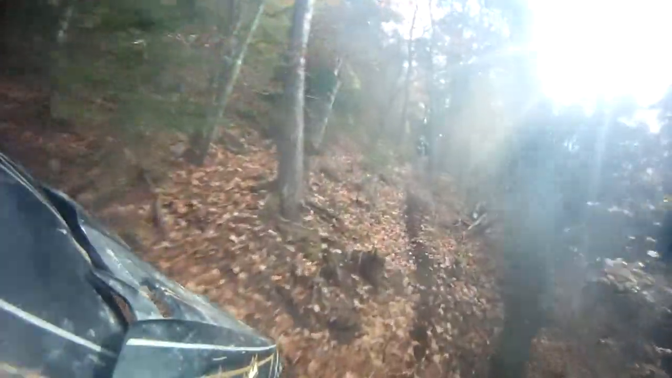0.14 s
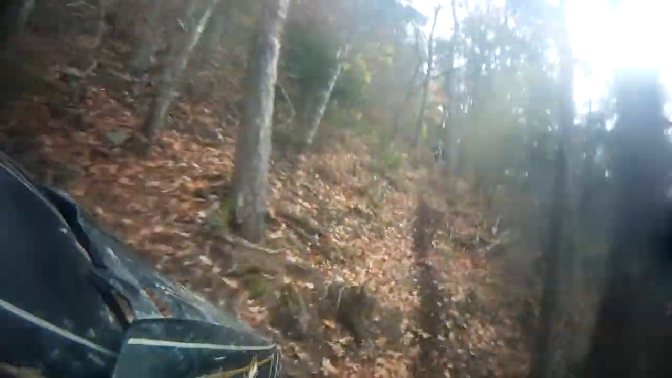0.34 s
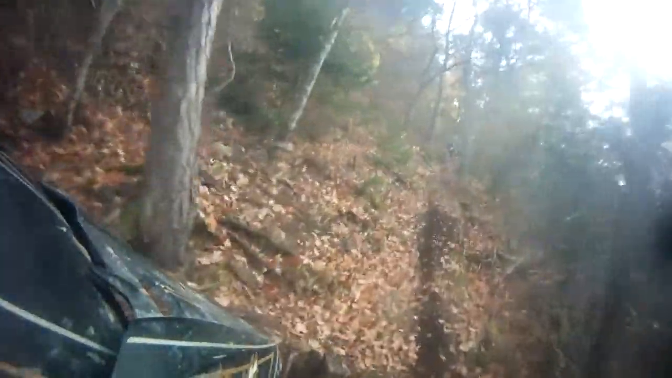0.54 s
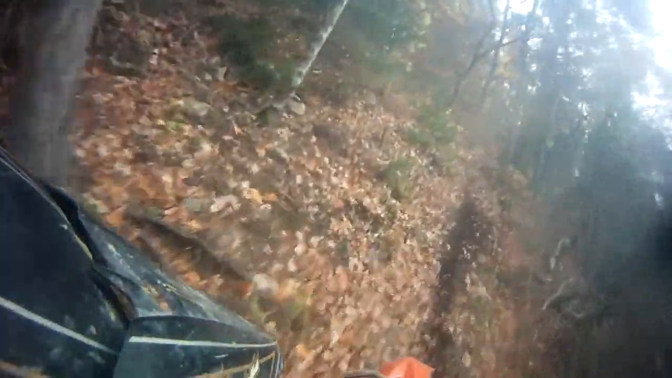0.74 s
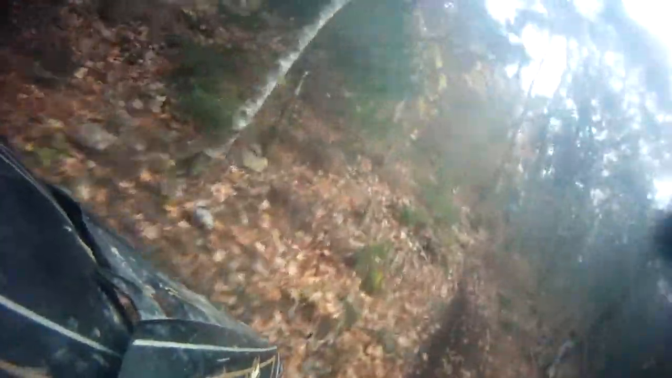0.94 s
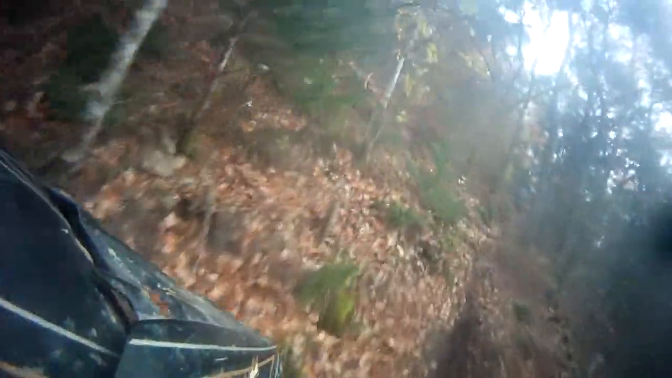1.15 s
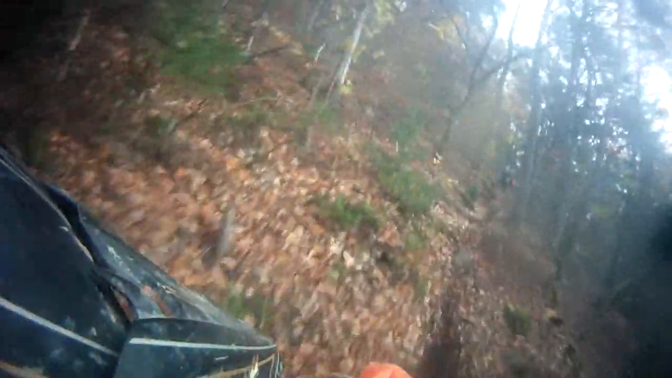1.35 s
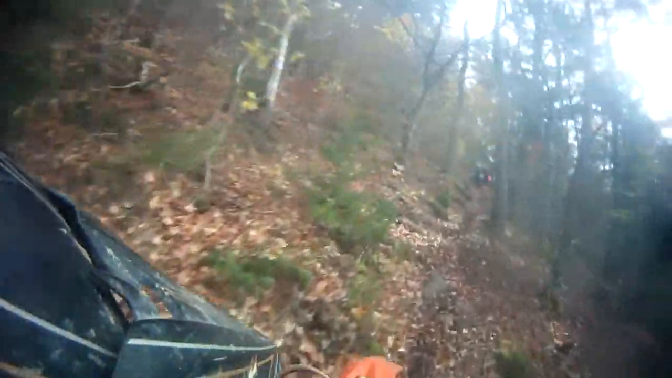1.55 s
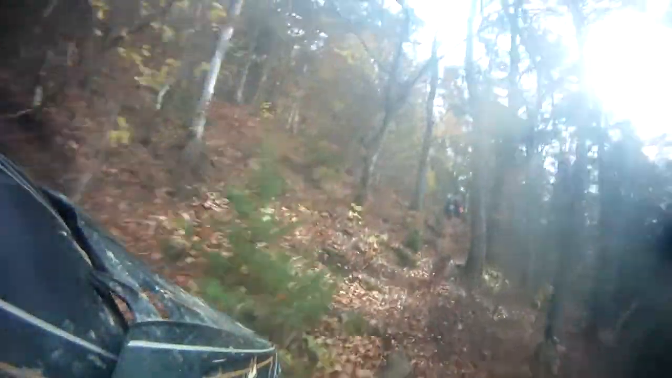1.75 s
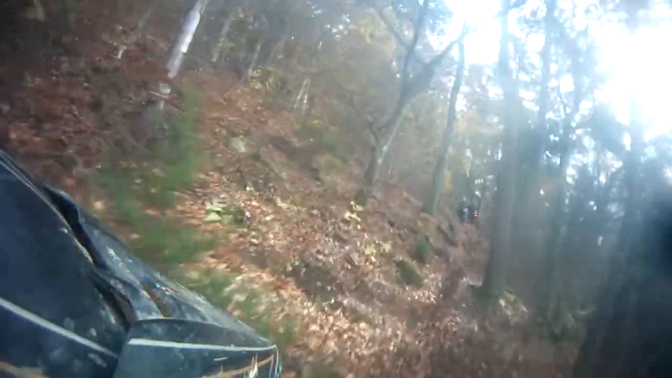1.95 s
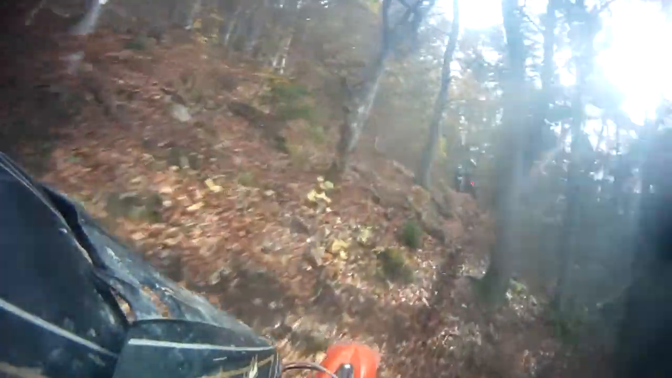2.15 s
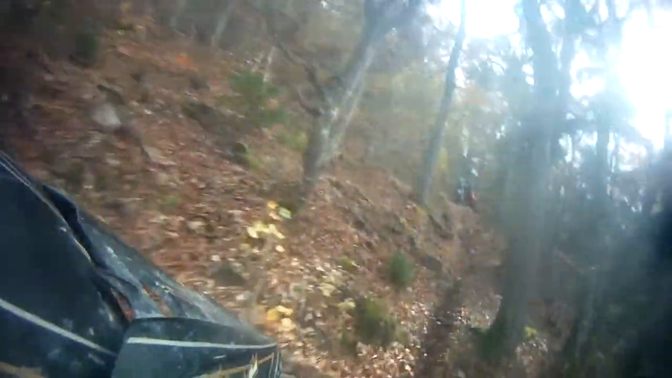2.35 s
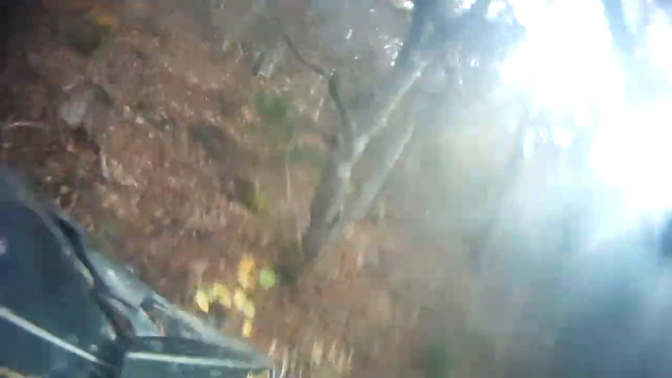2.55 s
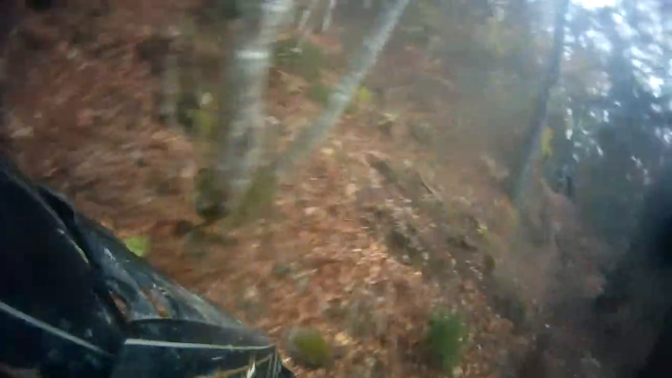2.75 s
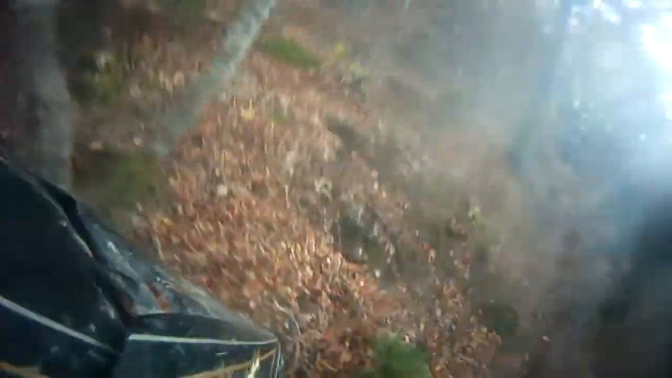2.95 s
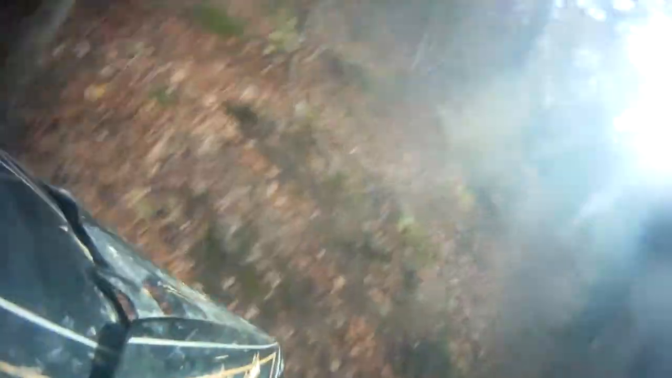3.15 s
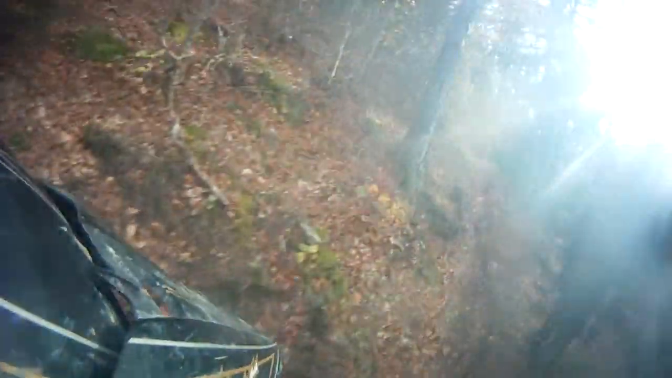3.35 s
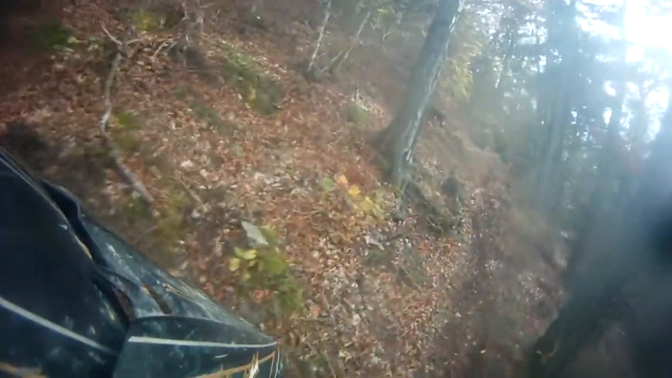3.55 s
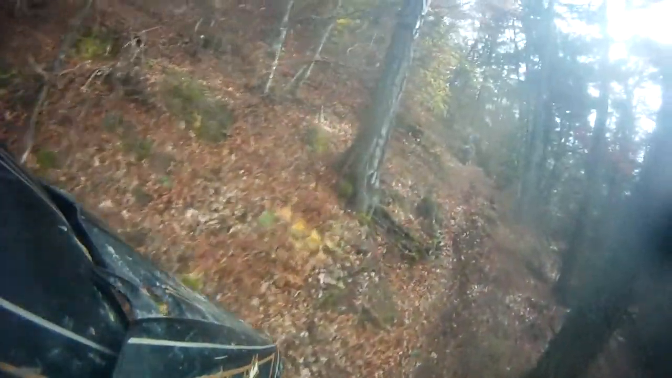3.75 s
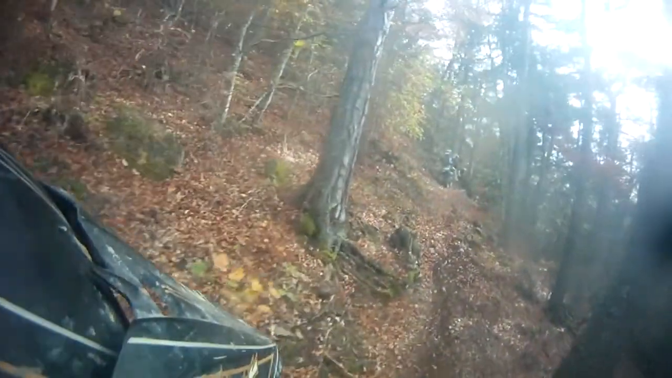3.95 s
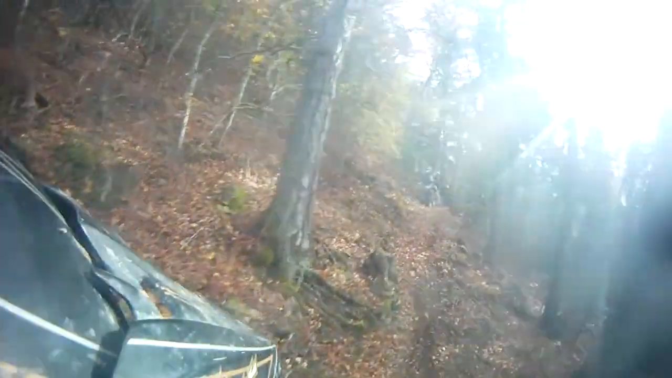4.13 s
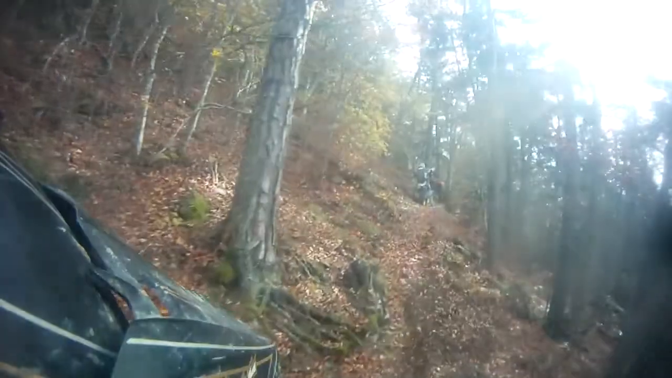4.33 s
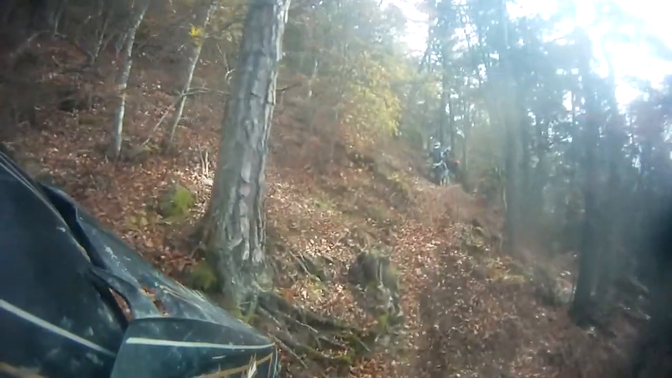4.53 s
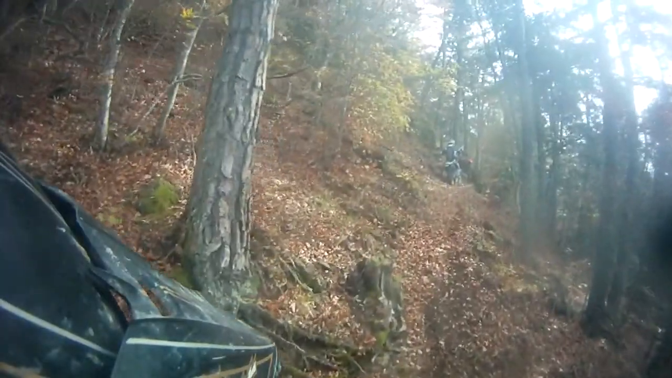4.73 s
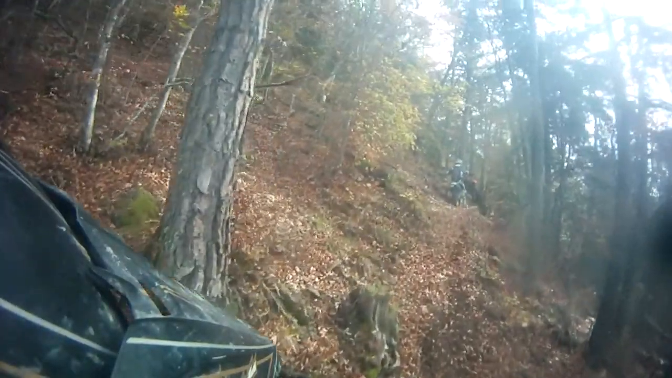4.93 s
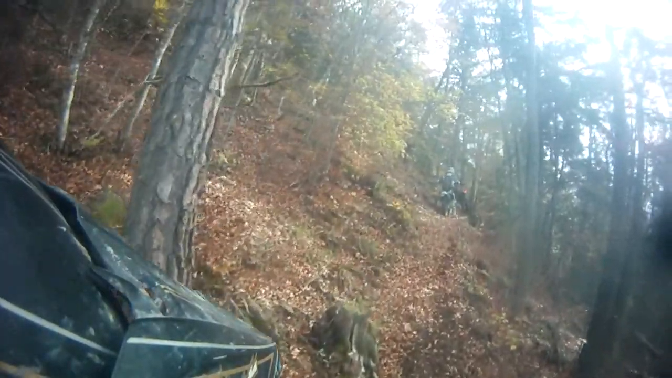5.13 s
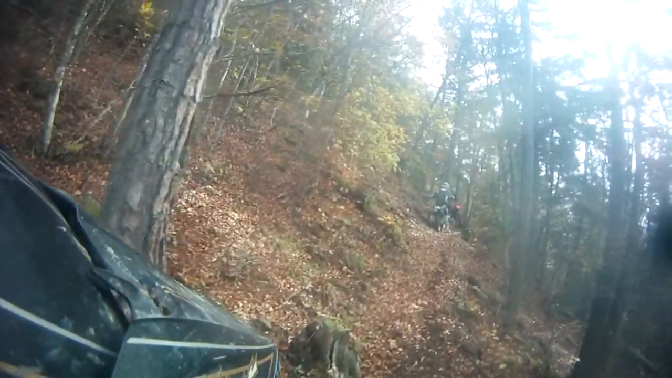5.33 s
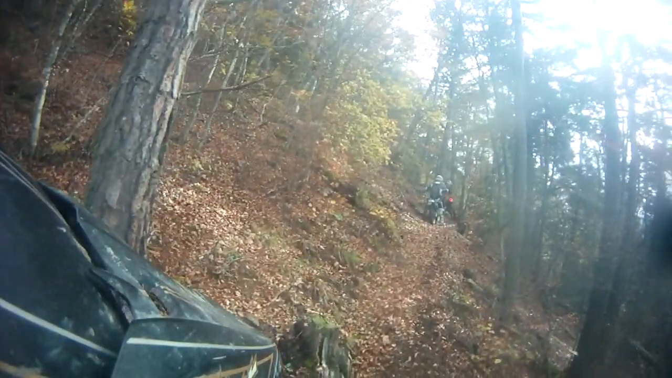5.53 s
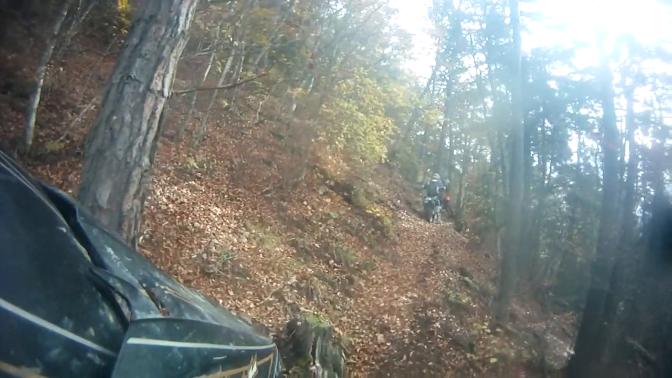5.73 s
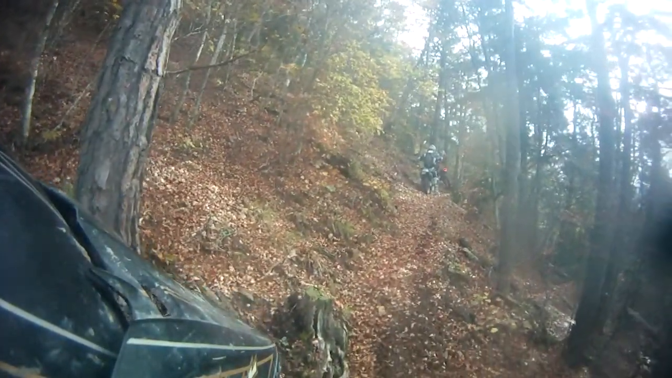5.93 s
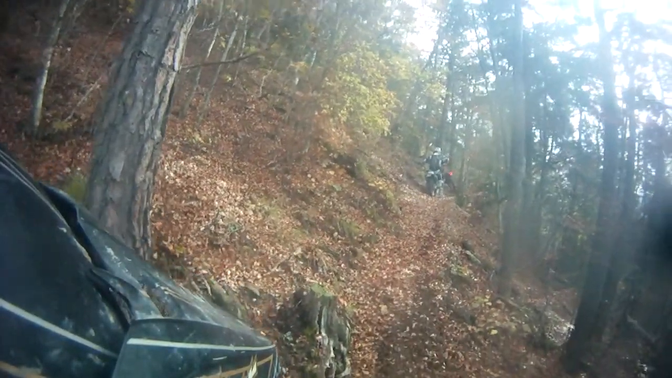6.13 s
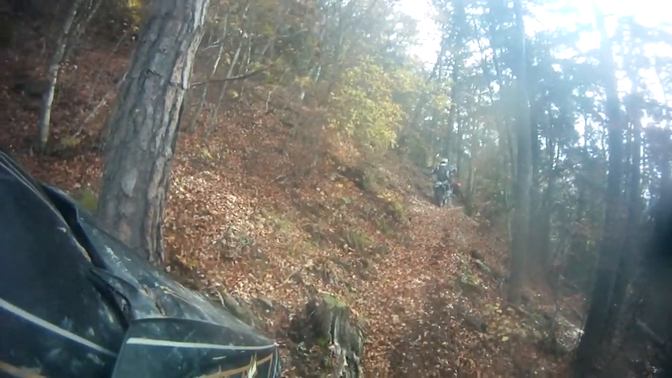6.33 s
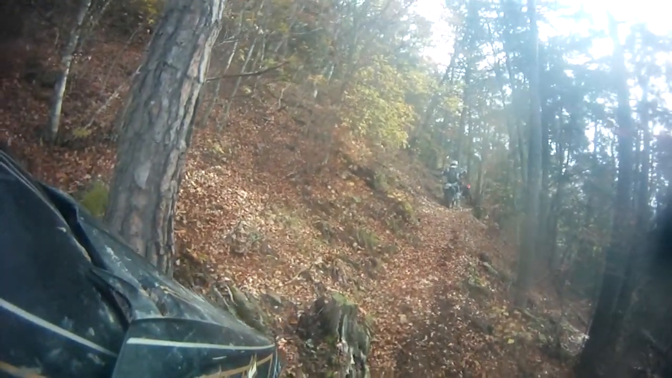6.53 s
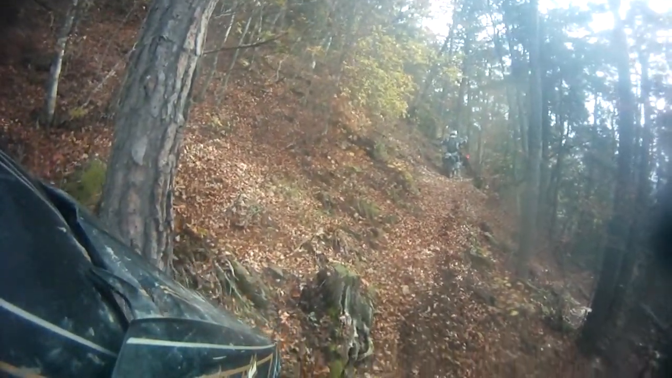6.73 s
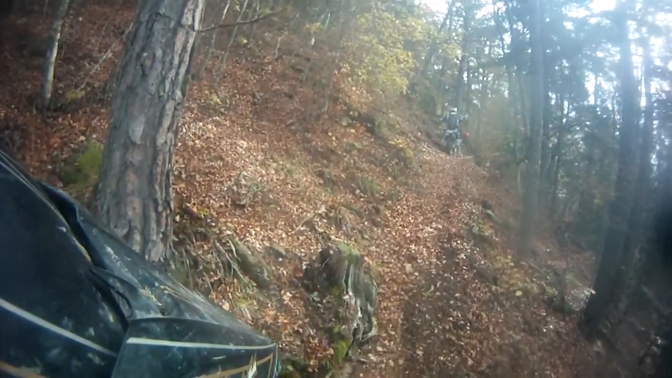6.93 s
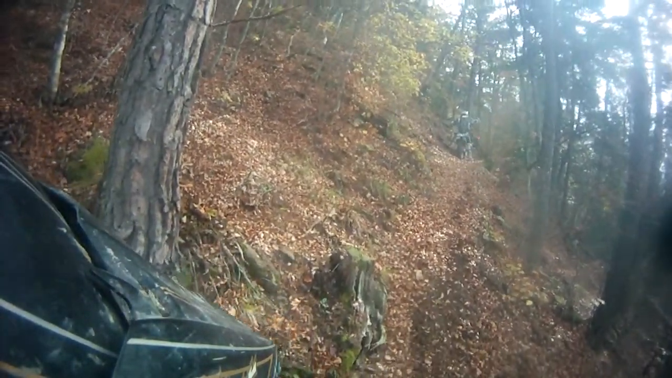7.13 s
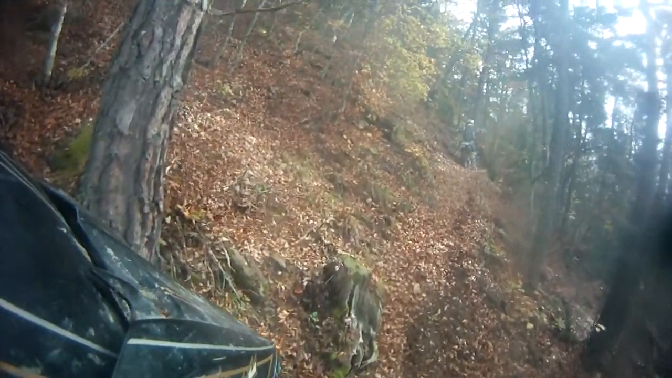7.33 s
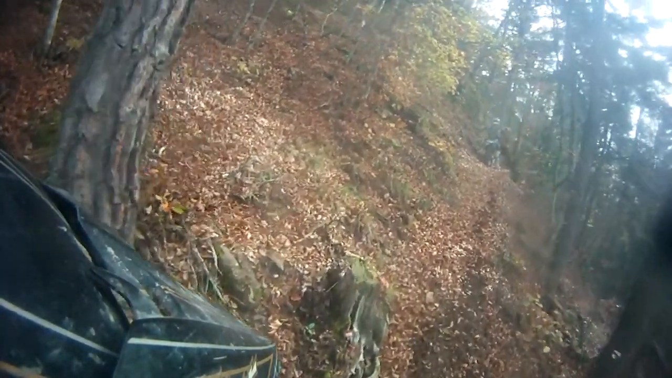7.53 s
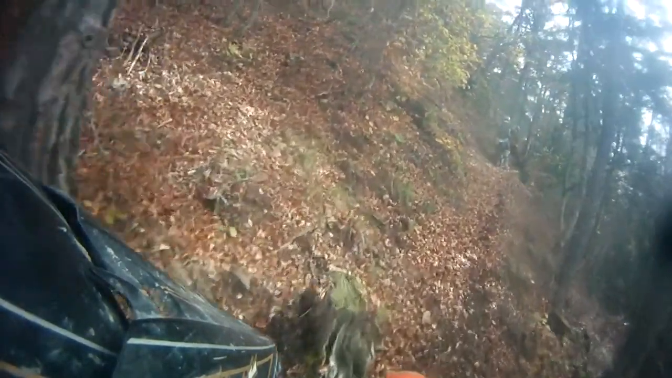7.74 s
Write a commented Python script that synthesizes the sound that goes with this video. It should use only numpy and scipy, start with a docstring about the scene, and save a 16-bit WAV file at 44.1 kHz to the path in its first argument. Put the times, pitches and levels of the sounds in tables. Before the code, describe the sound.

Close to a helmet microphone in open woodland, a four-stroke off-road motorcycle revs unevenly, its exhaust barking and its valves clattering. As the throttle eases, a branch whips the helmet with two sharp snaps, followed by crackling twigs and a run of hollow knocks. The engine blips a few times, drops to a ticking idle with a short chain scrape, then revs up once more.

```python
"""Dirt bike on a forest trail

A single-cylinder four-stroke, heard from the rider's helmet; the throttle opens and falls to idle.
Each firing thuds in the silencer and barks, while piston and valves clatter in the casing.
Tyres rumble, the camera mount knocks over bumps, twigs scrape and a branch slaps the helmet.
Later the slack chain drags at idle. A very faint high tone runs throughout."""
import sys
import numpy as np
from scipy import signal
from scipy.fft import rfft, irfft, next_fast_len
from scipy.io import wavfile
from scipy.ndimage import uniform_filter1d, map_coordinates

SR = 44100
rng = np.random.default_rng(int(sys.argv[2]) if len(sys.argv) > 2 else 0)


def file_out(sig):
    """Save sig as 16-bit WAV at sys.argv[1]."""
    # one column per channel
    cols = np.atleast_2d(sig).T
    # limit, then scale
    lim = np.clip(cols, -1, 1)
    pcm = np.round(lim * 32767).astype(np.int16)
    wavfile.write(sys.argv[1], SR, pcm)


N = 347508


def amp(db):
    """Decibels to gain."""
    return 10 ** (np.asarray(db) / 20)


def unit(x):
    """Scaled to rms 1."""
    return x / np.sqrt(np.mean(x ** 2) + 1e-20)


def noise():
    """White noise, rms 1."""
    return rng.standard_normal(N)


def curve(rows):
    """(seconds, value) rows interpolated to one value per sample."""
    return np.interp(np.arange(N) / SR, *np.transpose(rows))


def wobble(knots_per_s):
    """Smooth random curve."""
    return map_coordinates(rng.standard_normal(8192), [np.arange(N) * knots_per_s / SR], mode="mirror")


def gesture(start_s, end_s, rise_s, fall_s):
    """Trapezoid within 0-1: rises from start_s, falls from end_s."""
    t = np.arange(N) / SR
    return np.clip(np.minimum((t - start_s) / rise_s, 1 - (t - end_s) / fall_s), 0, 1)


def blows(times_s, sizes):
    """One-sample pushes at the given times."""
    samples = np.round(np.asarray(times_s) * SR).astype(int)
    return np.bincount(np.clip(samples, 0, N), sizes, N + 1)[:N]


def fading(pushes, decay_s):
    """Gives each push an exponential tail."""
    return signal.lfilter([1], [1, -np.exp(-1 / (SR * decay_s))], pushes)


def filtered(x, response):
    """x through a complex frequency response."""
    size = next_fast_len(N + SR // 2)
    return irfft(rfft(x, size) * response(np.fft.rfftfreq(size, 1 / SR)), size)[:N]


def colour(points, hz):
    """Gain of a (Hz, dB) spectrum on a log frequency axis."""
    points_hz, db = np.transpose(points)
    return amp(np.interp(np.log(hz + 1), np.log(points_hz), db))


def resonances(modes, hz):
    """Complex response of each (centre Hz, width Hz, dB) mode."""
    return np.array([amp(db) * 1j * hz * width / (centre ** 2 - hz ** 2 + 1j * hz * width)
                     for centre, width, db in modes])


def mode_power(modes, hz):
    """Sum of the modes' squared gains."""
    return np.sum(np.abs(resonances(modes, hz)) ** 2, 0)


def ring(x, gain, size=8192):
    """x through a minimum-phase body of spectral shape gain(hz), impulse energy 1."""
    cepstrum = irfft(np.log(np.abs(gain(np.fft.rfftfreq(size, 1 / SR))) + 1e-6))
    cepstrum[1:size // 2] *= 2
    cepstrum[size // 2 + 1:] = 0
    impulse = irfft(np.exp(rfft(cepstrum)))
    return signal.oaconvolve(x, impulse / np.linalg.norm(impulse))[:N]


# Engine speed. Each row: time in seconds, firings per second.
FIRING_RATE = [(0.006, 25.12), (0.26, 27.8), (0.469, 20.35), (0.612, 30.58), (0.819, 27.15), (0.95, 32.19),
               (1.04, 27.32), (1.162, 27.58), (1.468, 27.93), (1.821, 28.49), (1.933, 30.8), (2.256, 28.38),
               (2.359, 32.21), (2.622, 21.36), (3.35, 16.04), (3.369, 21.8), (3.707, 14.17), (3.845, 23.19),
               (4.247, 17.3), (4.453, 17.04), (4.639, 16.66), (5.106, 30.56), (5.24, 30.0), (5.39, 26.5),
               (5.492, 24.79), (6.018, 16.25), (6.407, 15.72), (6.654, 15.66), (6.846, 15.11),
               (7.032, 22.59), (7.195, 23.7), (7.461, 25.02), (7.61, 24.92), (7.691, 24.55), (7.896, 24.45)]


def cycle_times(phase):
    """Times in seconds at which each engine cycle reaches a phase, in cycles after firing."""
    cycles = np.cumsum(curve(FIRING_RATE)) / SR - 0.15
    return np.interp(np.arange(int(cycles[-1]) + 1) + phase, cycles, np.arange(N) / SR, right=N / SR)


def strokes(phase, scatter_db, jitter_s):
    """One push per engine cycle, uneven in size and timing."""
    times_s = cycle_times(phase)
    timing, size = rng.standard_normal((len(times_s), 2)).T
    return blows(times_s + jitter_s * timing, amp(scatter_db * size))


# Throttle twists. Each row: start, rise time and release in seconds, opening 0-1, fall time in seconds.
TWISTS = [(-.1, 0.065, 0.27, 0.54, 0.13), (0.492, 0.065, 0.6, 1, 0.23), (0.6, 0.05, 1.3, 0.72, .1),
          (1.03, 0.061, 2.31, 1, 0.5), (3.3, 0.03, 3.49, 0.64, 0.04), (3.652, 0.068, 3.935, 0.87, 0.82),
          (4.66, 0.074, 4.75, 0.77, 0.7), (6.83, 0.11, 7.87, 0.92, 0.2), (7.0, .75, 7.1, 0.97, 0.11)]


def throttle_opening():
    """Opening 0-1; the widest of overlapping twists wins."""
    return np.max([opening * gesture(start_s, release_s, rise_s, fall_s)
                   for start_s, rise_s, release_s, opening, fall_s in TWISTS], 0)


def drive(rate, throttle, idle_db, doubling_db, open_db, idle_hz=16):
    """Gain of an engine sound: idle_db, plus doubling_db per doubled speed and open_db at full throttle."""
    return amp(idle_db + doubling_db * np.log2(rate / idle_hz) + open_db * throttle)


def chamber(hz, centre_hz=271, width_hz=146, valve_lead_s=0.002246):
    """All-pass: the silencer chamber fills over a few swings, so putts swell; the valve opens early."""
    swing = centre_hz ** 2 - hz ** 2 + 1j * hz * width_hz
    return np.conj(swing) / swing * np.exp(2j * np.pi * hz * valve_lead_s)


# Pressure steps as the valves open and shut. Each row: phase in cycles, level in dB.
PRESSURE_STEPS = [(0, 0), (0.299, -7.5), (0.66, -10.5)]
# Silencer modes. Each row: centre in Hz, width in Hz, gain in dB.
SILENCER_MODES = [(144, 43, -5), (187, 30, -27), (258.7, 41, 8.5), (418, 36, 9.5), (468, 18, 4),
                  (867, 100, 2.5), (1077, 35, 8), (1555, 88, 15)]


def exhaust(rate, throttle, cool_hz=22, hot_hz=25, hot_shift=0.025):
    """Pressure steps ring the silencer; with speed the late ones grow and hot gas raises the note."""
    def silencer(hz):
        tilt = colour([(40, -10.5), (110, 2), (300, 3), (640, -11), (900, 0.5), (2000, -22)], hz)
        return np.sqrt(mode_power(SILENCER_MODES, hz)) * tilt

    speed = rate / rate.max()
    pulses = sum(amp(db) * speed ** (4 * phase) * strokes(phase, scatter_db=1.54, jitter_s=0.00005)
                 for phase, db in PRESSURE_STEPS) * np.sqrt(SR / rate)
    heat = np.clip((rate - cool_hz) / (hot_hz - cool_hz), 0, 1)
    cool = ring(pulses * (1 - heat), silencer)
    hot = ring(pulses * heat, lambda hz: silencer(hz / (1 + hot_shift)))
    gain = drive(rate, throttle, idle_db=-65.5, doubling_db=0.96, open_db=22.5)
    return -gain * filtered(cool + hot, chamber)


# Rushing exhaust gas. Each row: frequency in Hz, gain in dB.
BARK_SPECTRUM = [(120, -75), (420, -6.5), (520, 1.5), (620, -18), (760, -4.5), (895, 5), (1000, -8.5),
                 (1100, -2.5), (1180, -11), (1260, 2), (1360, -6), (1540, 3.5), (1750, -7), (2400, -0.5),
                 (4000, -5.5), (9000, -45)]


def bark(rate, throttle, steady=0.046, blow_db=-10):
    """Gas rushes out in a rough puff each cycle, just after the weaker blow of combustion."""
    puff = fading(strokes(phase=0.023, scatter_db=1.1, jitter_s=0.00018), decay_s=0.0076)
    blow = fading(strokes(phase=0.77, scatter_db=1.5, jitter_s=0.00021), decay_s=0.012)
    gas = unit((steady + puff + amp(blow_db) * blow) * noise())
    gain = drive(rate, throttle, idle_db=-66.5, doubling_db=1.5, open_db=27.4)
    return gain * ring(gas, lambda hz: colour(BARK_SPECTRUM, hz))


# Intake modes. Each row: centre in Hz, width in Hz, gain in dB before squaring.
INTAKE_MODES = [(7750, 1100, 3), (10000, 650, -11)]


def intake(rate, throttle):
    """Air hisses through the intake at wide throttle."""
    gain = drive(rate, throttle, idle_db=-96.5, doubling_db=9.9, open_db=35.8)
    return gain * ring(noise(), lambda hz: mode_power(INTAKE_MODES, hz))


# Metal contacts. Each row: phase in cycles, open- and shut-throttle levels in dB, decay in seconds.
METAL_CONTACTS = [(0.051, -17, -25, 0.013), (0.14, -38, -14, 0.0062), (0.3, -31, -10, 0.0056),
                  (0.56, -22.5, -12, 0.0062), (0.768, -15, -15.5, 0.01)]


def contact_force(throttle, whirr=0.11, grain_db=2.5):
    """Hits over a grainy chain and gear whirr, running rms 1; piston leads under load, valves at idle."""
    hits = 0
    for phase, open_db, shut_db, decay_s in METAL_CONTACTS:
        pushes = strokes(phase, scatter_db=2.5, jitter_s=0.0005)
        hits += amp(shut_db + (open_db - shut_db) * throttle) * fading(pushes, decay_s)
    force = hits + whirr * amp(grain_db * wobble(330))
    return force / np.sqrt(uniform_filter1d(force ** 2, size=8000))


# Fin and casing modes. Each row: centre in Hz, width in Hz, gain in dB.
CASING_MODES = [(2144, 46, -0.5), (2570, 157, 2), (2760, 160, -6), (3246, 51, 5.5), (3560, 96, -0.5),
                (3794, 92, -3), (4137, 122, 4.5), (4590, 200, 1.5), (4760, 130, -3.5), (5000, 118, 0),
                (6540, 268, -6.5), (7980, 370, -16.5), (9830, 430, -24)]
# Dense bed of weaker modes. Each row: frequency in Hz, gain in dB.
CASING_BED = [(60, -35), (250, -55), (460, -48), (560, -23), (900, -9), (1800, -3), (2500, 0), (4800, 1.5),
              (5600, -8.5), (7000, -9.5), (8600, -65), (12000, -56), (15500, -48)]


def casing(hz, bed_db):
    """Casing gain: sharp modes, their treble shaded by the helmet, on a broad bed."""
    modes = np.linalg.norm(resonances(CASING_MODES, hz), ord=3, axis=0)
    shade = colour([(400, -14), (2000, -0.5), (8000, -1), (11000, -3), (15500, -19)], hz)
    return np.hypot(modes * shade, amp(bed_db) * colour(CASING_BED, hz))


def clatter(rate, throttle, force):
    """Piston and valve contacts ring the fins and casing."""
    gain = drive(rate, throttle, idle_db=-42.66, doubling_db=5.03, open_db=7.1)
    return gain * ring(force * noise(), lambda hz: casing(hz, bed_db=-7))


# Valve gear ticks. Each row: phase in cycles, level in dB.
TAPPET_TICKS = [(0.66, -1.5), (0.54, 1), (0.31, -14)]
# Tick colour. Each row: frequency in Hz, gain in dB.
TICK_SPECTRUM = [(1500, -26), (4500, -4), (6600, 5), (8000, -5), (12000, -20.5), (15500, -29)]


def tappets(rate, throttle, decay_s=0.00098):
    """Thin bright ticks from the valve gear."""
    pushes = sum(amp(db) * strokes(phase, scatter_db=2, jitter_s=0.0003) for phase, db in TAPPET_TICKS)
    gain = drive(rate, throttle, idle_db=-46, doubling_db=0, open_db=7)
    return gain * ring(fading(pushes, decay_s) * noise(), lambda hz: colour(TICK_SPECTRUM, hz))


# Gas pumped past the exhaust valve. Each row: phase in cycles, signed push.
PUMP_STROKES = [(-0.04, -0.53), (0.1, 0.07), (0.379, 0.31)]
# Pipe modes. Each row: centre in Hz, width in Hz, gain in dB.
PIPE_MODES = [(120, 48, 5), (210, 130, 0), (294, 100, 0)]


def pumping(rate, throttle):
    """Soft putts: the piston pumps gas even with the throttle shut."""
    pulses = sum(push * strokes(phase, scatter_db=1.2, jitter_s=0.00012)
                 for phase, push in PUMP_STROKES) * np.sqrt(SR / rate)
    pipe = lambda hz: np.sqrt(mode_power(PIPE_MODES, hz)) * colour([(320, -1.5), (700, -20)], hz)
    return drive(rate, throttle, idle_db=-60, doubling_db=6.5, open_db=-1) * ring(pulses, pipe)


# Gearbox whirr. Each row: frequency in Hz, gain in dB.
GEAR_SPECTRUM = [(250, -50), (400, -31), (480, -9.5), (540, 0), (600, -12.5), (690, -0.5), (790, -9.5),
                 (904, 3), (1300, -3.5), (1500, 2), (1800, -15), (5000, -33)]


def gears(rate, throttle):
    """The gearbox whirrs, louder with speed and slightly louder unloaded."""
    gain = drive(rate, throttle, idle_db=-54, doubling_db=10, open_db=-1.5)
    return gain * ring(noise(), lambda hz: colour(GEAR_SPECTRUM, hz))


# Long-ringing casing modes. Each row: centre in Hz, width in Hz, gain in dB.
SINGING_MODES = [(3220, 63, 0.5), (3306, 100, 2), (3820, 83, -5.5), (4135, 100, -1.5)]


def singing(rate, throttle, force, critical_hz=27, knee_hz=1.7, surge_db=11.5):
    """Narrow casing modes ring between blows and surge above a critical firing rate."""
    tilt = [(1000, -31), (2400, 5.5), (4600, 1.5), (7000, -19)]
    modes = lambda hz: np.abs(resonances(SINGING_MODES, hz)).max(0) * colour(tilt, hz)
    surge = amp(surge_db / (1 + np.exp((critical_hz - rate) / knee_hz)))
    gain = drive(rate, throttle, idle_db=-52, doubling_db=9.6, open_db=-3)
    return gain * surge * ring(force * noise(), modes)


# Loud metallic engine clacks, mostly on single hard firings. Each row: time in seconds, level in dB.
HARD_CLACKS = [(0.562, -15), (0.596, -37), (1.117, -24), (1.395, -24), (1.689, -23.5), (1.795, -21),
               (1.829, -26), (1.864, -27), (2.024, -20), (2.123, -28), (2.303, -36), (3.705, -26),
               (3.774, -16.5), (4.009, -32), (4.056, -29), (4.16, -29.5), (4.217, -27), (4.28, -25.5),
               (4.793, -28), (6.905, -23.5), (6.958, -21), (7.008, -17.5), (7.051, -20), (7.182, -23),
               (7.223, -25), (7.265, -25), (7.428, -26)]


def clacks(throttle, firing_db=-22, shut_db=-30, attack_s=0.0002, decay_s=0.0027):
    """Each firing under throttle knocks through the casing, with single hard clacks on top."""
    hard_s, hard_db = np.transpose(HARD_CLACKS)
    firing_s = cycle_times(0)
    firings = blows(firing_s, amp(firing_db - 0.1 * rng.uniform(0.17, 1, len(firing_s))))
    pushes = blows(hard_s, amp(hard_db)) + firings * amp(shut_db * (1 - throttle))
    force = fading(fading(pushes, decay_s), attack_s) / (SR * attack_s)
    return ring(force * noise(), lambda hz: casing(hz, bed_db=2))


# Reflection bands between engine and helmet. Each row: centre in Hz, width in Hz, gain in dB.
PATH_BANDS = [(345, 53, -4.5), (993, 77, -6), (2997, 150, -5.5), (3900, 72, 4.5), (4560, 91, -9)]


def path_to_helmet(hz):
    """Path gain: reflections cut four narrow bands and lift one."""
    return amp(sum(db * np.exp(-(2 * (hz - centre) / width) ** 2) for centre, width, db in PATH_BANDS))


# Tyre and frame rumble. Each row: time in seconds, level in dB.
RUMBLE_LEVELS = [(0, -62), (2.3, -49), (2.9, -48.5), (3.5, -66), (4.5, -64), (5.3, -66), (6.7, -68),
                 (7.88, -55)]
# Rumble colour. Each row: frequency in Hz, gain in dB.
RUMBLE_SPECTRUM = [(20, -7), (45, -12), (100, -26), (300, -7.5), (450, -21), (550, -7.5), (1200, -12),
                   (3000, -26.5), (12000, -35.5)]


def tyres(bump_db=1.5, bumps_per_s=9):
    """Tyres roll over leaves and roots in uneven swells."""
    gain = amp(curve(RUMBLE_LEVELS) + bump_db * wobble(bumps_per_s))
    return gain * ring(noise(), lambda hz: colour(RUMBLE_SPECTRUM, hz))


def whistle(hz=11090, db=-79):
    """A very faint steady high tone."""
    return amp(db) * np.sin(2 * np.pi * hz * np.arange(N) / SR)


# Main jolts to the mount. Each row: time in seconds, relative level in dB, hardness 0-1.
MAIN_JOLTS = [(.006, -19, 0.34), (.847, -24, 0.53), (1.066, -21, 0.3), (2.588, -25, 0.8),
              (2.637, -16, 0.66), (2.666, -9.5, 0.12), (2.691, -7, 0.32), (2.77, -35.5, 1), (2.857, -18, 0),
              (2.95, -21, 0), (3.03, -25.5, 0.17), (3.091, -23, 0.14), (3.133, -13, 0.14),
              (3.141, -26.5, 0.7), (3.185, -16.5, 0.34), (3.321, -21, 0.28)]


def jolts(bounce_s=0.0064, bounce_db=-14.5, rough_s=(2.55, 3.25), count=6, small_hardness=0.15):
    """Jolt rows: the main ones, one bounce each, and small ones scattered over the rough stretch."""
    bounces = np.add(MAIN_JOLTS, (bounce_s, bounce_db, 0))
    timing, size = rng.uniform(size=(count, 2)).T
    small_s = np.interp(np.arange(count) + timing, (0, count), rough_s)
    small_db = -40 + 6 * size
    small = np.column_stack([small_s, small_db, np.full(count, small_hardness)])
    return np.vstack([MAIN_JOLTS, bounces, small])


# Helmet shell and mount modes. Each row: centre in Hz, width in Hz, gain in dB.
MOUNT_MODES = [(50, 25, -15), (123, 41, -14.5), (190, 43, -12.5), (288, 53, -9), (511, 60, 3),
               (735, 83, -6.5), (878, 55, -2.5), (1290, 150, 0.5), (1476, 85, 0), (2340, 330, -8.5),
               (3300, 1500, -18)]


def mount(gain_db=12.5, scuff=0.25, scuff_decay_s=0.0065, soft_hz=650):
    """Jolts knock the mount on the shell with a short scuff; soft ones reach only the low modes."""
    times_s, db, hardness = np.transpose(jolts())
    sizes = amp(db + gain_db)
    grit = noise()
    scuffed = lambda pushes: pushes + scuff * fading(pushes, scuff_decay_s) * grit
    hard = scuffed(blows(times_s, sizes * hardness))
    soft = scuffed(blows(times_s, sizes * (1 - hardness)))
    soft = filtered(soft, lambda hz: 1 / (1 + (hz / soft_hz) ** 4))
    shell = lambda hz: np.sqrt(mode_power(MOUNT_MODES, hz)) * colour([(5000, -4.5), (12000, -13)], hz)
    return ring(hard + soft, shell)


# Twigs dragging past. Each row: start in seconds, length in seconds, level in dB.
TWIG_DRAGS = [(2.575, 0.12, -45), (3.018, 0.061, -45), (3.112, 0.027, -42)]
# Twig crackle. Each row: frequency in Hz, gain in dB.
TWIG_SPECTRUM = [(1000, -43), (4000, 8.5), (8000, -0.5), (11000, -11), (15500, -24)]


def twigs(grain_db=5, grains_per_s=300):
    """Twigs drag over the shell in a fine crackle."""
    crackle = unit(amp(grain_db * wobble(grains_per_s)) * noise())
    pressure = sum(amp(db) * gesture(start_s, start_s + length_s, rise_s=0.017, fall_s=0.049)
                   for start_s, length_s, db in TWIG_DRAGS)
    return pressure * ring(crackle, lambda hz: colour(TWIG_SPECTRUM, hz))


# Branch slaps. Each row: time in seconds, blow and brush in dB, rebound delay in seconds, rebound in dB.
BRANCH_SLAPS = [(2.5885, 2.5, -18, .0105, -14), (2.6529, -2.5, -19, 0.0061, -12.5)]
# Slap colour. Each row: frequency in Hz, gain in dB.
SLAP_SPECTRUM = [(60, 6), (500, 2.5), (1500, 4), (2800, 8.5), (4200, 7), (5200, 10.5), (6200, 5),
                 (10000, -9), (15500, -19)]


def branch(brush_lead_s=0.0043):
    """A branch whips the helmet: the tip brushes, the blow lands with a snap, then it rebounds."""
    times_s, blow_db, brush_db, delay_s, rebound_db = np.transpose(BRANCH_SLAPS)
    pushes = blows(times_s, amp(blow_db))
    brush = fading(blows(times_s - brush_lead_s, amp(brush_db)), decay_s=0.0033)
    blow = fading(pushes, decay_s=0.0016)
    rebound = fading(blows(times_s + delay_s, amp(rebound_db)), decay_s=0.0033)
    snap = fading(pushes, decay_s=0.0004) * noise()
    return ring((brush + blow + rebound) * noise(), lambda hz: colour(SLAP_SPECTRUM, hz)) + snap


# Whole-helmet modes. Each row: centre in Hz, width in Hz, gain in dB before squaring.
HELMET_MODES = [(46, 30, -4), (148, 53, -2), (260, 130, -3.5)]


def helmet_thud(at_s=2.646, db=-18, decay_s=0.01):
    """The branch shoves the whole helmet in a low thud."""
    push = fading(blows([at_s], [amp(db)]), decay_s) * noise()
    return ring(push, lambda hz: mode_power(HELMET_MODES, hz))


# Chain drags at idle. Each row: time of peak in seconds, level in dB.
CHAIN_DRAGS = [(6.451, -39), (6.477, -25.5), (6.528, -30.5), (6.577, -39.5), (6.607, -39)]


def chain(rise_s=0.011, fall_s=0.01):
    """The slack chain drags over its guide in short bursts that ring the casing."""
    drag = sum(amp(db) * gesture(peak_s - rise_s, peak_s, rise_s, fall_s) for peak_s, db in CHAIN_DRAGS)
    return ring(drag * noise(), lambda hz: casing(hz, bed_db=-3))


def lever(at_s=6.9, db=-17):
    """A small hollow click: one push rings two modes."""
    modes = [(1080, 87, 9), (1430, 88, -20)]
    return ring(blows([at_s], [amp(db)]), lambda hz: resonances(modes, hz).sum(0))


def scene():
    """Speed and throttle drive the engine; open air, the same signal on both channels."""
    rate = curve(FIRING_RATE)
    throttle = throttle_opening()
    force = contact_force(throttle)
    engine = (exhaust(rate, throttle) + bark(rate, throttle) + intake(rate, throttle)
              + clatter(rate, throttle, force) + tappets(rate, throttle) + pumping(rate, throttle)
              + gears(rate, throttle) + singing(rate, throttle, force) + clacks(throttle) + chain())
    ride = branch() + helmet_thud() + twigs() + mount() + lever() + tyres()
    return np.tile(ring(engine, path_to_helmet) + ride + whistle(), (2, 1))


def record(dry):
    """Hard limit at full scale, then a brick-wall low-pass."""
    top_hz = 15500
    return np.array([filtered(side, lambda hz: hz < top_hz) for side in np.clip(dry, -1, 1)])


dry = scene()
out = record(dry)
file_out(out)
```